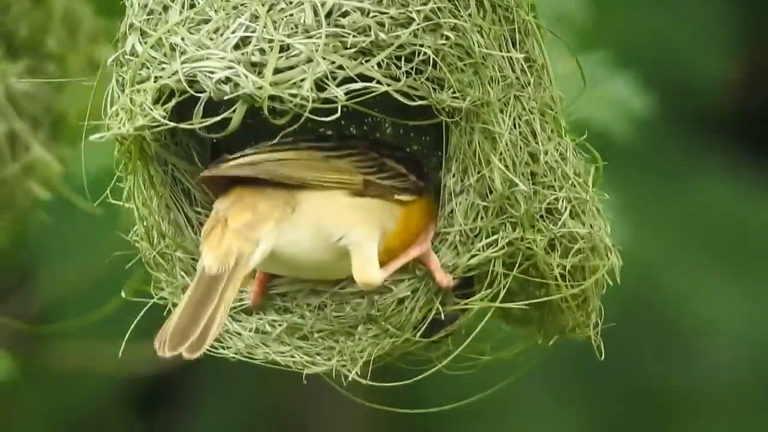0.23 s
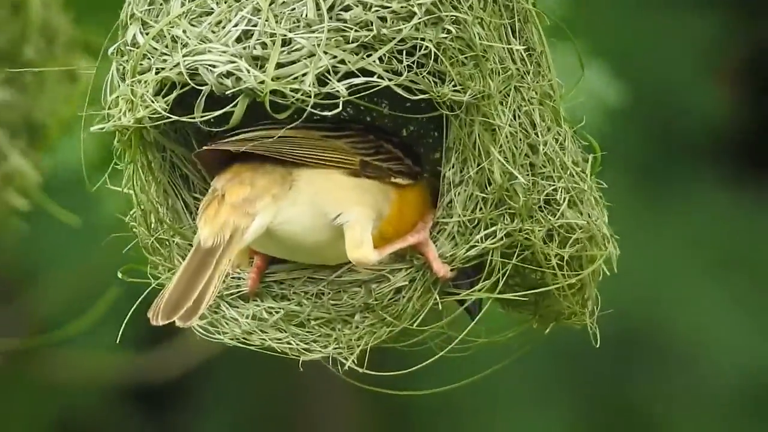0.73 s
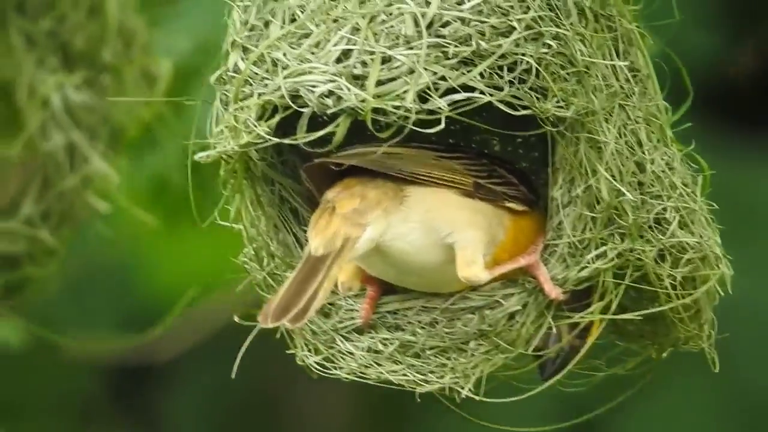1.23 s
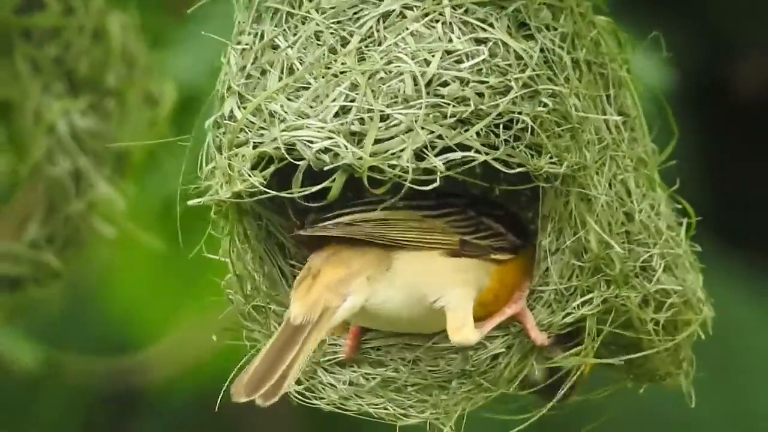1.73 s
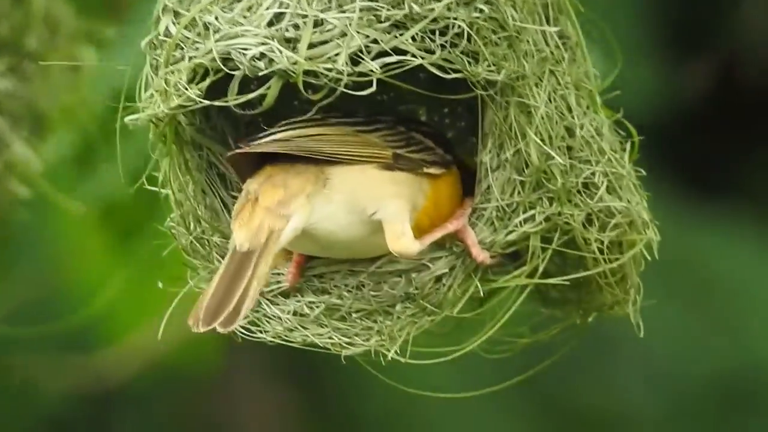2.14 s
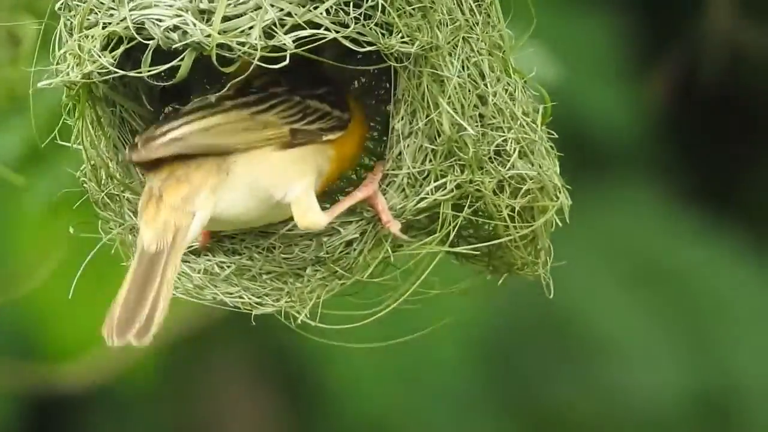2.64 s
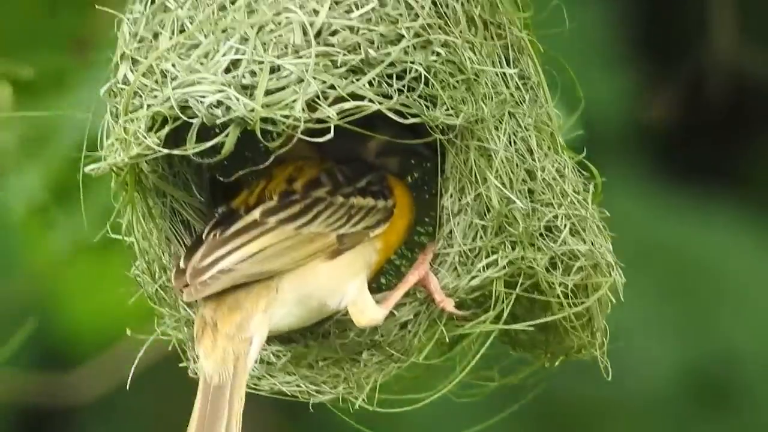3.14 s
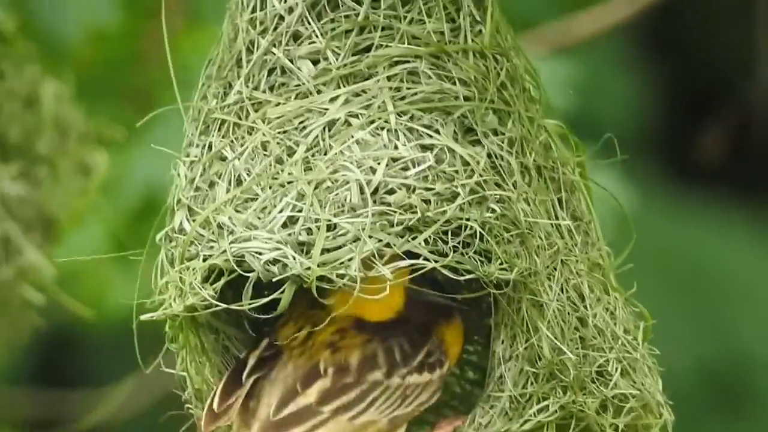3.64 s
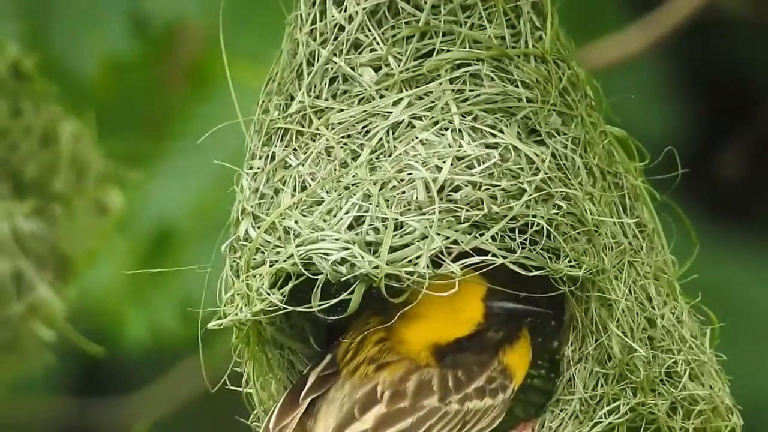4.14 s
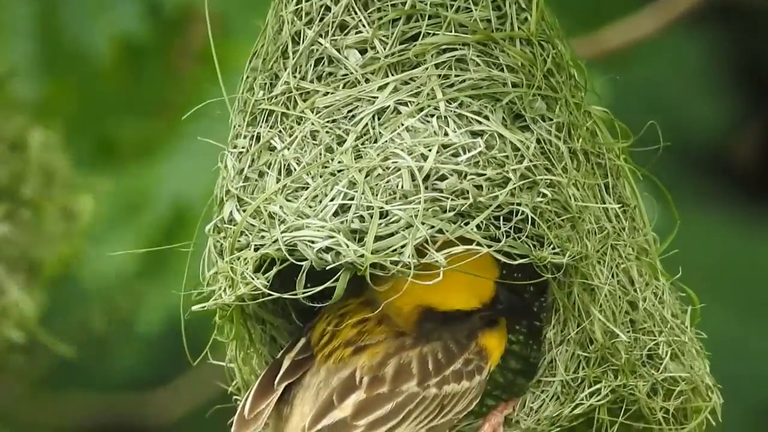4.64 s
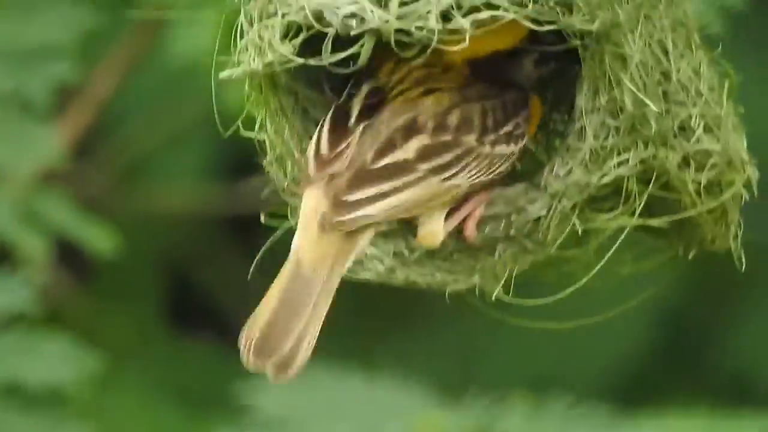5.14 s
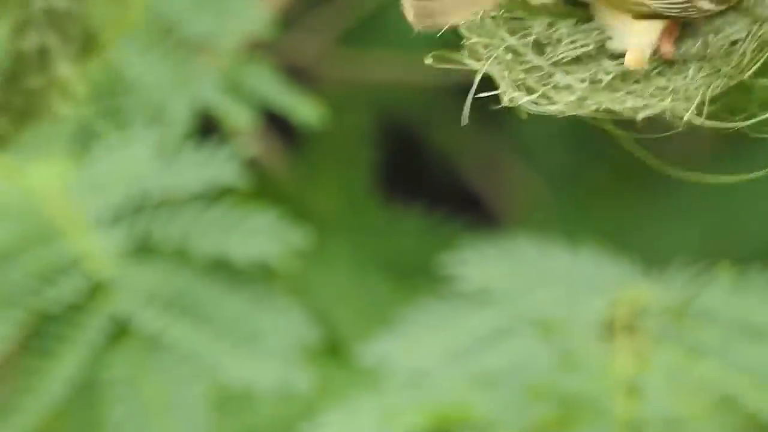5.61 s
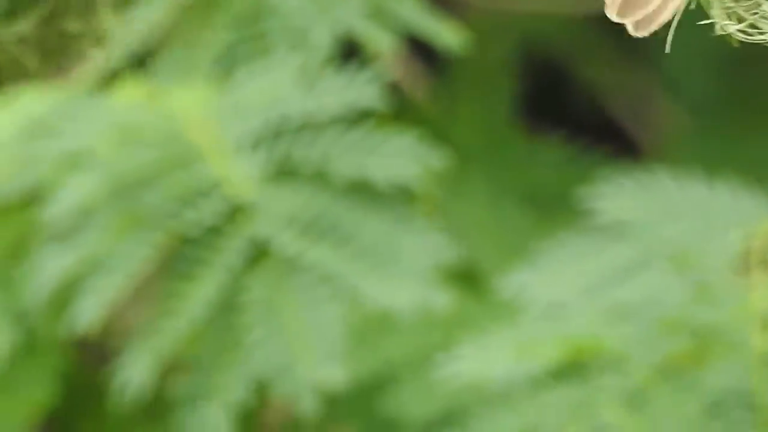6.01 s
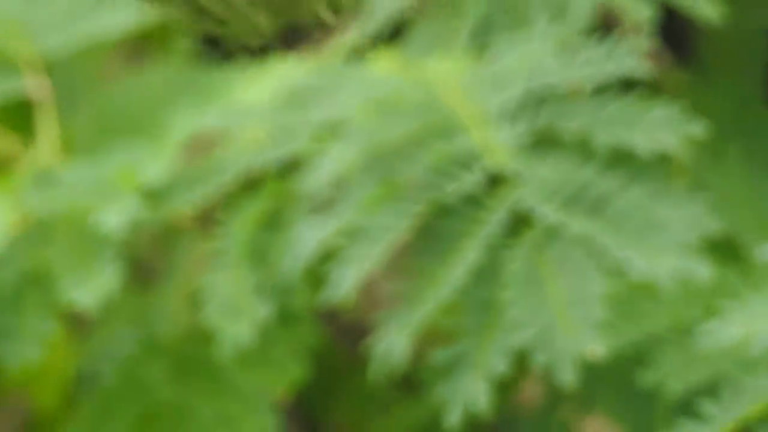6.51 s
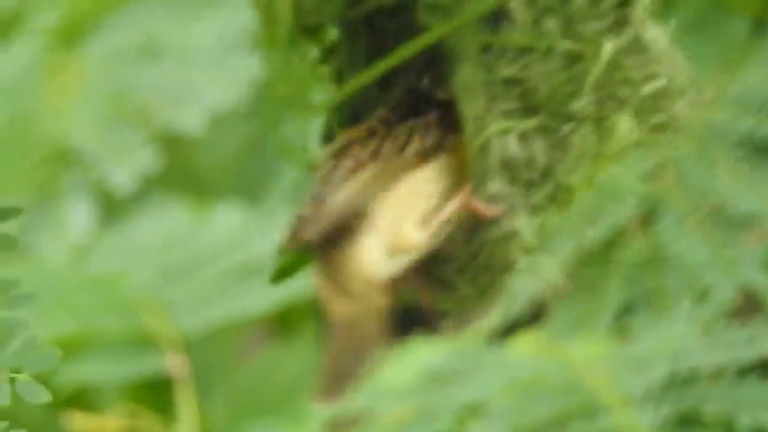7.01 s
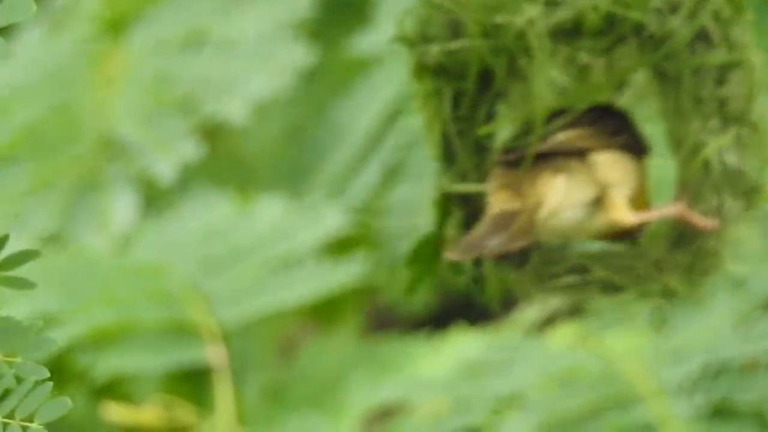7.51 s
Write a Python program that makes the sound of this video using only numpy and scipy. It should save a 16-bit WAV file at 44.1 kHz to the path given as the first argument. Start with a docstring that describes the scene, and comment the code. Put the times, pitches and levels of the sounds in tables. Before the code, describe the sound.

A lively weaver colony outdoors: bright, rough down-sweeping chips from near males, short rolling churrs and a dense run of twitters, then a whistle and a scratchy two-voiced buzz. Later the chips grow louder and more regular, about five a second, while a far bird mews. Leaves scatter each call with short echoes; distant chatter, a passing low rush and light puffs of breeze lie beneath.

```python
"""Weaver birds in leafy trees: near males scold in harsh chips, bursts of steep down-sweeps with period doubling.
They add low churrs, short twitters, a trembling whistle and a two-voiced wheezing buzz.
Other birds slur downward and a far one mews with a reed and a whistle; foliage scatters every call with random echoes.
Behind lie shaped noise: the distant colony's hiss, a low murmur, a passing low rush and air on the microphone."""
import sys
import numpy as np
from scipy import signal
from scipy.fft import rfft, irfft, next_fast_len
from scipy.io import wavfile
from scipy.ndimage import uniform_filter1d, map_coordinates

SR = 44100
rng = np.random.default_rng(int(sys.argv[2]) if len(sys.argv) > 2 else 0)


def put_to_file(sound):
    """Save the sound as 16-bit audio at rate SR, in the file named by the first command-line argument."""
    columns = np.atleast_2d(sound).T  # one column per channel
    safe = np.clip(columns, -1, 1)
    whole_steps = np.round(safe * 32767)
    wavfile.write(sys.argv[1], SR, whole_steps.astype(np.int16))


N = 342216
TIME = np.arange(N) / SR
TOP_HZ = 15760  # band limit


def amp(db):
    """Decibels to gain."""
    return 10 ** (np.asarray(db) / 20)


def unit(x):
    """Scale to rms 1."""
    return x / np.sqrt(np.mean(x ** 2) + 1e-20)


def along(points, hz):
    """Interpolate (frequency, value) points on a log-frequency axis."""
    f, v = np.transpose(points)
    return np.interp(np.log(hz + 1), np.log(f + 1), v)


def curves(rows):
    """One value per sample for each column after the time."""
    s, *cols = np.transpose(rows)
    return [np.interp(TIME, s, c) for c in cols]


def wobble(rate, size=N):
    """A smooth random curve through normal knots, rate knots per second."""
    knots = rng.standard_normal(size // 8 + 4)
    return map_coordinates(knots, [np.arange(size) * rate / SR], mode="wrap")


def filtered(x, response):
    """Multiply the spectrum of x by a response of frequency."""
    size = next_fast_len(x.shape[-1] + 8192)
    spectrum = rfft(x, size) * response(np.fft.rfftfreq(size, 1 / SR))
    return irfft(spectrum, size)[..., :x.shape[-1]]


def add(track, s, x):
    """Mix x into the track at time s."""
    i = max(round(s * SR), 0)
    track[..., i:i + x.shape[-1]] += x[..., :track.shape[-1] - i]


def envelope(t, length, attack, release):
    """Linear rise, hold and fall within a length of time."""
    return np.clip(np.minimum(t / attack, (length - t) / release), 0, 1)


def progress(length):
    """The share of a short note that has passed, sample by sample."""
    return np.clip(np.arange(SR // 8) / SR / length, 0, 1)


# left-right likeness: (frequency [Hz], correlation [-1 to 1])
LIKENESS = [(60, 0.45), (130, 0.7), (220, 0.95), (400, .97), (1500, 0.97), (3500, 0.81), (6000, 0.55),
            (9000, 0.18), (14000, 0.16)]


def ports(pair):
    """Mix two unrelated sounds into two microphone ports, their correlation set by frequency."""
    def response(hz):
        turn = np.arccos(np.clip(along(LIKENESS, hz), -1, 1)) / 2
        return np.array([np.cos(turn), np.sin(turn)])
    mid, side = filtered(pair, response)
    return np.array([mid + side, mid - side])


def aside(x, lead_us):
    """Sound from one side reaches the left port lead_us microseconds before the right."""
    halves = np.array([[1], [-1]])
    return filtered(x, lambda hz: np.exp(1j * np.pi * hz * lead_us * 1e-6 * halves))


def rush(spectrum, patchy_db):
    """Stereo noise of rms 1, shaped by a spectrum, with random gain patches in time and frequency."""
    z = signal.stft(rng.standard_normal((2, N)), nperseg=512)[2]
    across_hz = uniform_filter1d(rng.standard_normal(z.shape[1:]), size=7, axis=0)
    patches = unit(uniform_filter1d(across_hz, size=9, axis=1))
    pair = signal.istft(z * amp(patchy_db * patches), nperseg=512)[1][:, :N]
    return unit(ports(filtered(pair, lambda hz: amp(along(spectrum, hz)))))


# decay of the tree tail: (frequency [Hz], t60 [s])
TREE_DECAY = [(2000, 0.3), (5000, 0.31), (7000, 0.39), (12000, 0.054)]
# colour of the reflections: (frequency [Hz], gain [dB])
REFLECTION_COLOUR = [(2000, -1.5), (3400, 7), (4400, 2.5), (5400, 2), (6200, 3.5), (6800, 10.5), (7700, 3),
                     (12000, 6)]


def foliage(x, leaves_db, trees_db, echo_db=-14, echo_s=.038, leaves_t60_s=0.13):
    """Direct sound, quick scatter from near leaves, one distinct echo and the tail of the trees."""
    size = SR // 2
    t = np.arange(size) / SR
    hz, frame_s, z = signal.stft(rng.standard_normal((2, size)), SR, nperseg=256)
    decay = amp(-60 * frame_s / along(TREE_DECAY, hz)[:, None])
    trees = signal.istft(z * decay, SR, nperseg=256)[1][:, :size]
    leaves = rng.standard_normal((2, size)) * amp(-60 * t / leaves_t60_s)
    build = 1 - np.exp(-t / .007)
    scatter = amp(leaves_db) * unit(leaves * build) + amp(trees_db) * unit(trees * build)
    paths = ports(scatter) / np.sqrt(size)
    paths[:, min(round(echo_s * SR), size - 1)] += amp(echo_db)
    paths = filtered(paths, lambda f: amp(along(REFLECTION_COLOUR, f)))
    paths[:, 0] += 1  # direct sound
    return signal.fftconvolve(x[None], paths, axes=1)


def tone(pitch, second_db=-36, third_db=-50):
    """An almost pure whistle: a sine with faint second and third harmonics."""
    phase = 2 * np.pi * np.cumsum(pitch) / SR
    third = amp(third_db) * (3 * pitch < TOP_HZ) * np.sin(3 * phase)
    return np.sin(phase) + amp(second_db) * np.sin(2 * phase) + third


# beak resonance: (frequency [Hz], gain [dB])
BEAK_GAIN = [(1500, -1.5), (2600, -17), (3400, 6), (4400, 4), (5400, 4.5), (6700, 4.5), (7600, -6.5),
             (9000, -13), (12000, -25.5), (16000, -38)]


def syrinx(pitch, harsh, overtone_db=-14):
    """A tone through the beak; when harsh, period doubling adds lines halfway between the harmonics."""
    phase = 2 * np.pi * np.cumsum(pitch) / SR
    # (multiple of pitch, gain before the beak)
    lines = [(1, 1), (2, amp(overtone_db) + harsh / 2), (1 / 2, harsh), (3 / 2, harsh), (5 / 2, harsh / 2)]
    out = 0
    for k, gain in lines:
        beak = amp(along(BEAK_GAIN, k * pitch)) * (k * pitch < TOP_HZ)
        out = out + gain * beak * np.sin(k * phase)
    return out


def sweeps(hz, length, rate, fall, sag, fade_db):
    """Pitch, loudness and cycle count of sweeps falling `fall` octaves; the first peaks two periods in."""
    t = np.arange(SR // 6) / SR - 2 / rate
    uneven = .06 * wobble(45, len(t)) * np.clip(t * rate, 0, 1)  # sets in after the first peak
    cycle = t * rate + 1 / 2 + uneven
    place = cycle % 1 - 1 / 2
    pitch = hz * 2 ** (-fall * place - sag * t)
    pulse = np.cos(np.pi * place).clip(0) ** .6 * (.55 + .65 * np.exp(-(place / .17) ** 2))
    gate = (cycle > 0) * np.clip((length - t) * rate, 0, 1)
    hold = gate * amp(-fade_db * t / length + wobble(34.6, len(t)))
    return pitch, hold * pulse, cycle


def note(u, glide, rasp, fade_db, leaves_db):
    """A gliding note among the leaves; rasp is fast flutter of pitch and level."""
    pitch = glide * (1 + 0.171 * rasp * wobble(904, len(u)))
    shake_db = (1 + 4 * rasp) * wobble(250, len(u))
    swell = np.sin(np.pi * u).clip(0) ** 0.29
    call = swell * amp(shake_db - fade_db * u) * tone(pitch)
    return foliage(call, leaves_db, trees_db=-6.5)


# breeze course: (time [s], level [dB])
BREEZE_LEVEL = [(0, -53), (2.2, -52.5), (3.9, -48), (4.7, -58), (5.6, -49.5), (6.6, -61), (7.76, -56)]
# puffs: (peak time [s], level [dB])
AIR_PUFFS = [(3.25, -44), (3.5, -44), (3.91, -43.5), (4.3, -51), (5.19, -45), (5.31, -50), (5.82, -52)]
# air spectrum: (frequency [Hz], relative level [dB per Hz])
AIR_SPECTRUM = [(12, -44), (20, -33), (65, -2.5), (130, -19.5), (170, -84), (290, -120)]
PUFF_S, BREEZE_WOBBLE_DB = 0.032, 3  # puff half-width at 1/e; unrest of the breeze


def air():
    """Low noise from a restless breeze and a few puffs buffeting the microphone ports."""
    breeze = amp(curves(BREEZE_LEVEL)[0] + BREEZE_WOBBLE_DB * wobble(9))
    puffs = sum(amp(db) * np.exp(-((TIME - s) / PUFF_S) ** 2) for s, db in AIR_PUFFS)
    return (breeze + puffs) * rush(AIR_SPECTRUM, patchy_db=0.0)


# murmur course: (time [s], level [dB])
MURMUR_COURSE = [(0, -40.3), (2.3, -39.5), (3.1, -41), (4.8, -41), (5.8, -43), (7.1, -45), (7.76, -46)]
# murmur spectrum: (frequency [Hz], relative level [dB per Hz])
MURMUR_SPECTRUM = [(59, -34), (100, -2), (145, -5.5), (200, 2), (250, -2.5), (340, -.5), (426, -3.5),
                   (627, -1), (765, -7.5), (921, -3), (1680, -8), (2400, -8.5), (3120, -9), (5280, -120)]


def murmur():
    """Low outdoor murmur: patchy noise on a slow level course."""
    return amp(curves(MURMUR_COURSE)[0]) * rush(MURMUR_SPECTRUM, patchy_db=2.0)


# low rush spectrum: (frequency [Hz], relative level [dB per Hz])
SWELL_SPECTRUM = [(70, -20), (140, 3.5), (220, -2), (380, 0), (550, -9), (850, -4.5), (1400, -27),
                  (2000, -71)]
SWELL_S, SWELL_LENGTH_S, SWELL_ATTACK_S, SWELL_RELEASE_S, SWELL_DB = 4.33, 1.047, 0.23, 0.089, -42.5


def passing_rush():
    """A low rush of patchy noise that rises and passes."""
    passing = envelope(TIME - SWELL_S, SWELL_LENGTH_S, SWELL_ATTACK_S, SWELL_RELEASE_S)
    return amp(SWELL_DB) * passing * rush(SWELL_SPECTRUM, patchy_db=4.0)


# colony course: (time [s], level [dB])
COLONY_LEVEL = [(0, -36), (1.0, -34.5), (2.1, -37), (4.5, -33.5), (5.7, -37), (7.2, -39.5), (7.76, -41.5)]
# colony spectrum: (frequency [Hz], relative level [dB])
COLONY_SPECTRUM = [(1500, -31), (2500, -30.5), (3300, -6), (3900, -5.5), (5000, -0.5), (6400, 3),
                   (7500, -4.5), (9000, -15.5), (12000, -30), (15500, -40)]


def distant_colony():
    """Many far voices merge into a drifting, patchy hiss."""
    drift = amp(.5 * wobble(8))
    hiss = aside(rush(COLONY_SPECTRUM, patchy_db=2.5), lead_us=10.0)
    return amp(curves(COLONY_LEVEL)[0]) * drift * hiss


# nasal calls: (time [s], level [dB], length [s], lowest whistle pitch [Hz])
NASAL_CALLS = [(6.029, -34.5, 0.082, 2750), (6.204, -36.5, 0.11, 2673), (6.463, -36.5, 0.13, 2710),
               (6.915, -39, 0.12, 2670), (7.279, -35, 0.16, 2553)]
# throat resonance: (frequency [Hz], gain [dB])
THROAT_GAIN = [(1300, -43), (2000, -2), (2700, -9), (3300, -1.5), (4100, 3.5), (4700, 2.5), (6000, -1.5),
               (7000, -7), (11000, -29)]
MEW_TURN, MEW_RISE, MEW_DROOP = .55, .15, .3  # turning point (share of call); whistle bend, reed droop
MEW_ATTACK_S, MEW_RELEASE_S = 0.017, .01


def nasal_calls(reed_hz=672, reed_db=1, reed_fade_db=7, whistle_db=-7, whistle_swell_db=12):
    """A far bird mews with two voices: a reedy stack arches and fades, a whistle sags, turns up and swells."""
    out = np.zeros((2, N))
    t = np.arange(SR // 4) / SR
    for s, db, length, hz in NASAL_CALLS:
        u = np.clip(t / length, 0, 1)
        off_turn = np.abs(u - MEW_TURN) / MEW_TURN
        pitch = reed_hz * (1 - MEW_DROOP * off_turn ** 4) * (1 + 0.013 * wobble(297, len(t)))
        phase = 2 * np.pi * np.cumsum(pitch) / SR
        reed = sum(amp(along(THROAT_GAIN, k * pitch)) * np.sin(k * phase) for k in range(2, 15))
        bend = 1 + MEW_RISE * np.tanh((off_turn / 0.71) ** 3)
        high = amp(whistle_db + whistle_swell_db * u) * tone(hz * bend, second_db=-17)
        call = high + amp(reed_db - reed_fade_db * u) * unit(reed)
        loud = amp(db) * envelope(t, length, MEW_ATTACK_S, MEW_RELEASE_S)
        add(out, s, foliage(loud * call, leaves_db=-7, trees_db=-12))
    return out


# slurs: (time [s], level [dB], length [s], start pitch [Hz])
SLUR_NOTES = [(0.021, -21.5, 0.019, 5600), (0.357, -30, 0.023, 3610), (0.768, -33, 0.041, 3560),
              (1.172, -27.5, 0.033, 4940), (1.281, -28.5, 0.063, 4880), (1.427, -20.5, 0.015, 4280),
              (1.486, -22.5, 0.054, 4880), (1.639, -30.5, 0.043, 4150), (1.847, -24, 0.031, 4000),
              (2.412, -20, 0.024, 5400), (3.539, -30, 0.031, 3860), (3.703, -26, 0.051, 4690),
              (3.996, -32.5, 0.051, 4390), (4.294, -38.5, 0.052, 4440), (4.44, -34, 0.031, 3730),
              (4.574, -37.5, 0.046, 4340), (4.686, -27, 0.049, 3790), (5.001, -30, 0.024, 3700),
              (5.731, -39, 0.09, 4250), (6.348, -36, 0.043, 4330)]
SLUR_END_HZ, SLUR_BEND, SLUR_RASP = 2760, 1.3, 0.076  # bend: exponent, higher steepens later; rasp 0-1


def slurs():
    """Clean single notes slide down to one shared bottom pitch."""
    out = np.zeros((2, N))
    for s, db, length, start_hz in SLUR_NOTES:
        u = progress(length)
        glide = start_hz * (SLUR_END_HZ / start_hz) ** (u ** SLUR_BEND)
        add(out, s, amp(db) * note(u, glide, SLUR_RASP, fade_db=7, leaves_db=-6.5))
    return out


BUZZ_S, BUZZ_LENGTH_S, BUZZ_ATTACK_S, BUZZ_RELEASE_S = 2.425, 1.174, 0.097, 0.1
BUZZ_DB, BUZZ_SWELL_DB_PER_S = -29, 1.5
BUZZ_HZ, BUZZ_RISE_HZ_PER_S = 5446, 190  # upper voice
BUZZ_SCOOP_HZ, BUZZ_SCOOP_S = 497, .055  # upper voice enters from above and settles


def buzz():
    """A wheeze: both sides of the syrinx flutter about 490 times a second, one high and wide, one low and narrow."""
    t = np.clip(TIME - BUZZ_S, 0, BUZZ_LENGTH_S)
    hz = BUZZ_HZ + BUZZ_RISE_HZ_PER_S * t + BUZZ_SCOOP_HZ * np.exp(-t / BUZZ_SCOOP_S)
    flutter = np.sin(2 * np.pi * np.cumsum(490 * (1 + .12 * wobble(150))) / SR)
    high_hz = hz * (1 + 0.015 * flutter + 0.066 * wobble(1500))
    high = syrinx(high_hz, 0) * amp(1.6 * wobble(500))
    low_hz = 4350 * (1 + 0.0116 * wobble(600) + 0.031 * wobble(2200))
    low = syrinx(low_hz, 0) * (1 + .5 * flutter) * amp(2.3 * wobble(300))
    voice = unit(high) + amp(-7.0) * unit(low)
    loud = amp(BUZZ_DB + BUZZ_SWELL_DB_PER_S * t) * envelope(t, BUZZ_LENGTH_S, BUZZ_ATTACK_S, BUZZ_RELEASE_S)
    return aside(foliage(loud * voice, leaves_db=0.0, trees_db=-16.0)[:, :N], lead_us=-12)


# whistle course: (time [s], pitch [Hz], level [dB])
WHISTLE_COURSE = [(2.0, 3650, -26), (2.013, 3650, -22.5), (2.03, 3390, -31), (2.08, 3336, -31.5),
                  (2.16, 3290, -25), (2.225, 3630, -29), (2.28, 3620, -23.5), (2.32, 3526, -23),
                  (2.36, 3570, -31.5)]
WHISTLE_S, WHISTLE_LENGTH_S, WHISTLE_ATTACK_S, WHISTLE_RELEASE_S = 1.995, 0.41, 0.014, 0.018


def whistle(tremble_hz=98, beat_hz=42, beat_db=4.0):
    """One thin note dips and lifts; a fast tremble splits it into close strands, and its level beats."""
    hz, db = curves(WHISTLE_COURSE)
    tremble = np.sin(2 * np.pi * np.cumsum(tremble_hz * (1 + .2 * wobble(40))) / SR)
    pitch = hz * (1 + 0.02 * tremble + 0.0064 * wobble(220))
    beat = beat_db * np.sin(2 * np.pi * np.cumsum(beat_hz * (1 + 0.18 * wobble(20))) / SR)
    loud = envelope(TIME - WHISTLE_S, WHISTLE_LENGTH_S, WHISTLE_ATTACK_S, WHISTLE_RELEASE_S)
    call = loud * amp(db + beat + wobble(150)) * tone(pitch, second_db=-36, third_db=-40)
    return foliage(call, leaves_db=-10, trees_db=-19)[:, :N]


# twitters: (time [s], level [dB], length [s], mid pitch [Hz], rasp [0-1])
TWITTER_NOTES = [(1.11, -22, 0.026, 6000, 0.1), (1.145, -22, 0.033, 5620, 0.32),
                 (1.237, -27, 0.027, 6230, 0.6), (1.328, -28.5, 0.051, 4200, 0.1),
                 (1.396, -21.5, 0.051, 5500, 0.63), (1.627, -21, 0.054, 4400, 0.17),
                 (1.69, -30.5, 0.054, 4130, 0.46), (1.736, -24, 0.066, 5450, 0.59),
                 (1.801, -22.5, 0.063, 4616, 0.56)]
TWITTER_SAG_OCT = 0.118  # lost over a note


def twitters():
    """Short notes sink a little, some clean and some rasping with fast flutter."""
    out = np.zeros((2, N))
    for s, db, length, hz, rasp in TWITTER_NOTES:
        u = progress(length)
        glide = hz * 2 ** (TWITTER_SAG_OCT * (1 / 2 - u))
        add(out, s, amp(db) * note(u, glide, rasp, fade_db=5.0, leaves_db=-3))
    return out


# churrs: (first sweep peak time [s], level [dB], pitch at that peak [Hz], length from that peak [s])
CHURR_CALLS = [(0.509, -26, 4280, 0.081), (0.686, -20.5, 4250, 0.062), (0.860, -18, 4230, 0.076),
               (1.044, -18, 4110, 0.064), (1.44, -24, 3840, 0.05), (1.745, -29.5, 3950, 0.091),
               (4.053, -30, 3970, 0.066)]


def churrs(rate_hz=90, upper_ratio=1.33, upper_db=-10, lead_db=-13, dive_oct=.25):
    """Low, quick rolls sink in pitch after a soft first sweep; the other side of the syrinx rasps above."""
    out = np.zeros((2, N))
    for s, db, hz, length in CHURR_CALLS:
        pitch, loud, cycle = sweeps(hz, length, rate_hz, fall=0.705, sag=2.5, fade_db=13.0)
        pitch = pitch * 2 ** (-dive_oct * (cycle % 1 - 1 / 2).clip(0))  # each sweep steepens as it ends
        lead = amp(lead_db) * np.sin(np.pi * np.clip(cycle + 1, 0, 1))
        above = upper_ratio * hz * (1 + 0.041 * wobble(1160, len(pitch)))
        below = pitch * (1 + 0.026 * wobble(1001, len(pitch)))
        voice = tone(below) + amp(upper_db) * tone(above)
        call = amp(db) * (loud + lead) * voice
        add(out, s - 2 / rate_hz, foliage(call, leaves_db=-0.5, trees_db=-7.5))
    return out


# chips: (first sweep peak time [s], level [dB], pitch at that peak [Hz], length from that peak [s],
#         lead-in relative level [dB])
CHIP_CALLS = [(0.05, -20.5, 5820, 0.056, -10), (0.381, -21, 5800, 0.026, -15),
              (0.797, -26, 5650, 0.095, -18), (1.205, -23, 5630, 0.028, -10),
              (1.475, -21.5, 5240, 0.046, -5.5), (2.59, -22, 4890, 0.043, -12),
              (2.774, -22, 4870, 0.046, -15), (2.978, -18, 4900, 0.025, -17),
              (4.708, -21.5, 4944, 0.064, -4.5), (4.894, -18.5, 5200, 0.052, -9),
              (5.046, -13.5, 5344, 0.032, -13), (5.231, -17, 5280, 0.044, -5.5),
              (5.407, -15.5, 5370, 0.041, -16), (5.596, -18, 5280, 0.05, -9.5),
              (5.788, -16.5, 5210, 0.021, -18), (5.974, -16, 5460, 0.05, -13),
              (6.194, -19.5, 5520, 0.066, -8), (6.654, -16.5, 5280, 0.049, -14),
              (6.842, -17, 5310, 0.049, -8), (7.058, -20, 5340, 0.031, -12)]
CHIP_HZ, HARSH, HARSH_GROWS = 5312, .42, 2.37  # reference pitch, harshness there, growth exponent as pitch drops


def chips(rate_hz=76):
    """Near males scold in bursts of rough down-sweeps, each led in by a soft slide; lower calls are harsher."""
    out = np.zeros((2, N))
    for s, db, hz, length, lead_db in CHIP_CALLS:
        harsh = HARSH * (CHIP_HZ / hz) ** HARSH_GROWS
        fall_oct = 0.556 + 0.563 * harsh  # harsher calls sweep wider
        pitch, loud, cycle = sweeps(hz, length, rate_hz, fall_oct, sag=1.2, fade_db=9.5)
        pitch = pitch * 2 ** (-harsh * (cycle % 1 - 1 / 2).clip(0))  # and steepen as each sweep ends
        jitter = 1 + harsh * .05 * wobble(1100, len(pitch))
        lead_pitch = hz * rng.uniform(0.83, 1.08) * 2 ** (-.4 * (cycle + 1 / 2).clip(-1, 1))
        lead_loud = np.sin(np.pi * np.clip(cycle + 1, 0, 1)).clip(0) ** .5
        lead = lead_loud * syrinx(lead_pitch * jitter, 2.1 * harsh)
        call = amp(db) * (loud * syrinx(pitch * jitter, harsh) + amp(lead_db) * lead)
        add(out, s - 2 / rate_hz, foliage(call, leaves_db=-5, trees_db=-6.5, echo_db=-9))
    return aside(out, lead_us=-10.0)


def scene():
    """All the birds over the outdoor background."""
    background = air() + murmur() + passing_rush() + distant_colony()
    other_birds = nasal_calls() + slurs()
    near_males = buzz() + whistle() + twitters() + churrs() + chips()
    return background + other_birds + near_males


def record(dry):
    """Cut everything above the band limit."""
    return filtered(dry, lambda hz: hz < TOP_HZ)


dry = scene()
out = record(dry)
put_to_file(out)
```